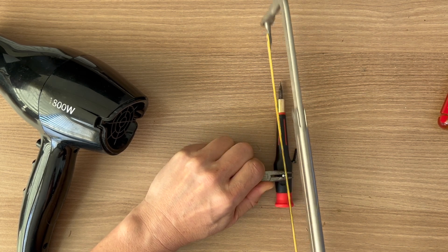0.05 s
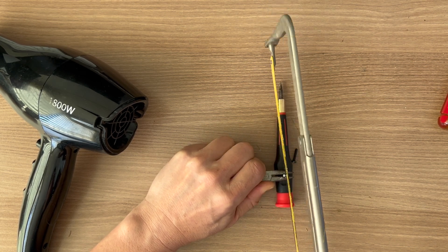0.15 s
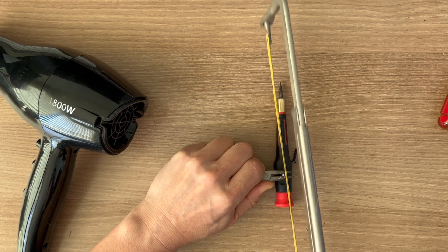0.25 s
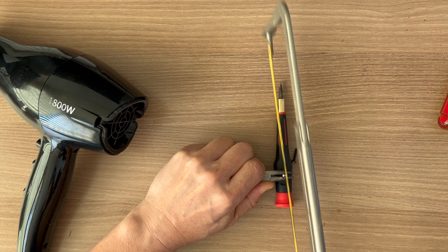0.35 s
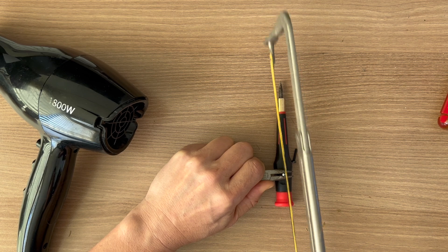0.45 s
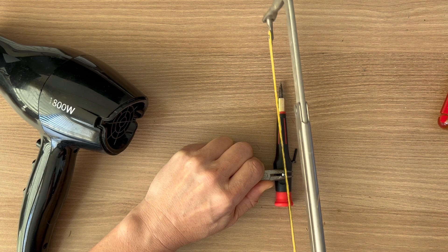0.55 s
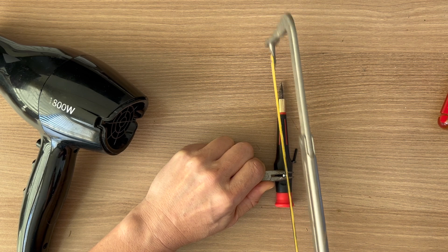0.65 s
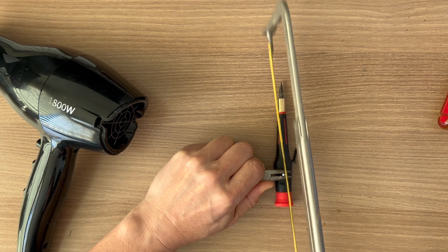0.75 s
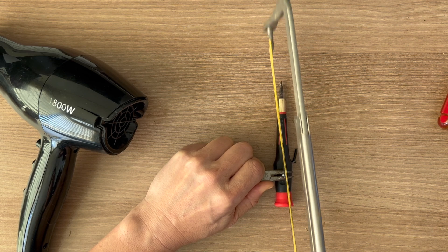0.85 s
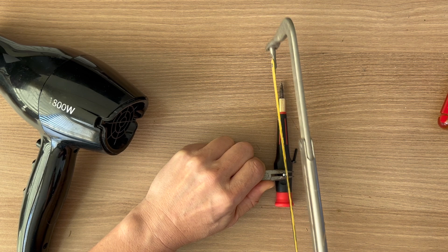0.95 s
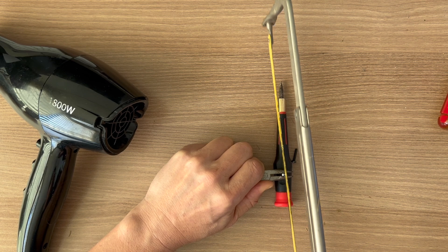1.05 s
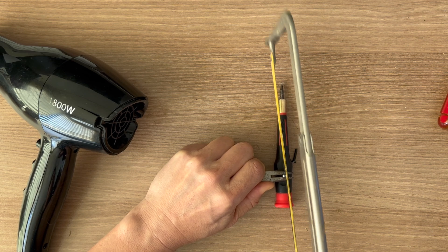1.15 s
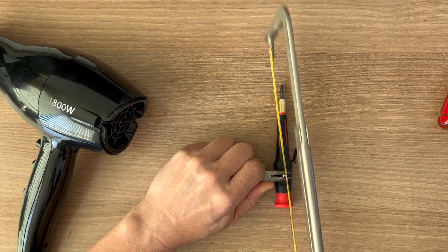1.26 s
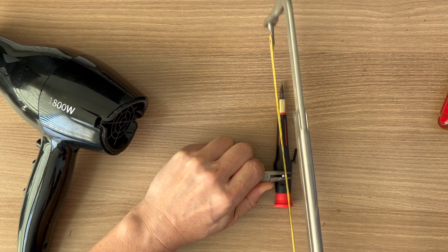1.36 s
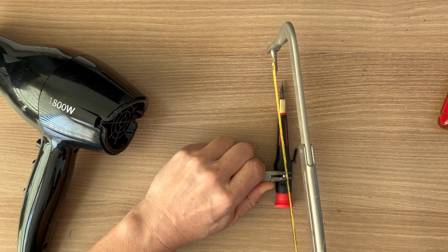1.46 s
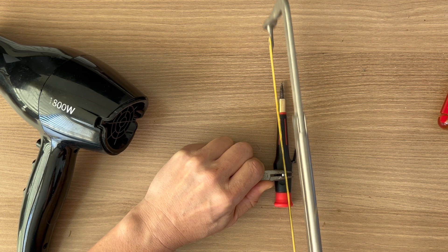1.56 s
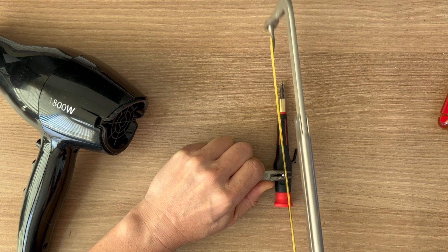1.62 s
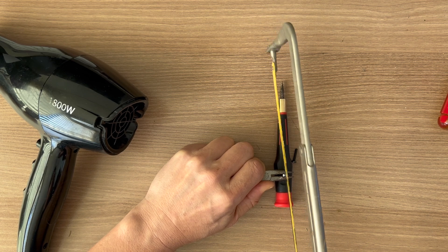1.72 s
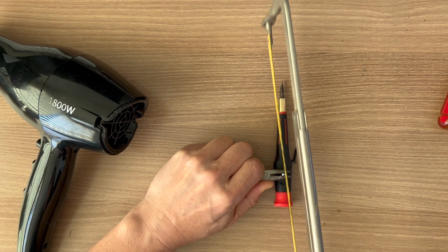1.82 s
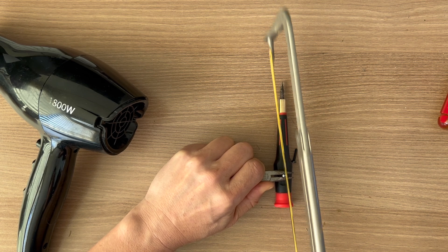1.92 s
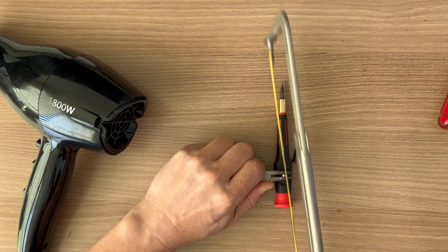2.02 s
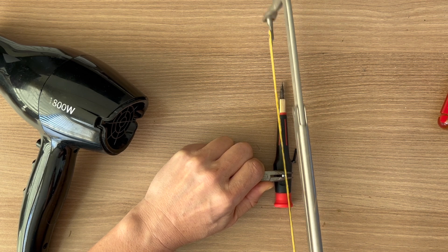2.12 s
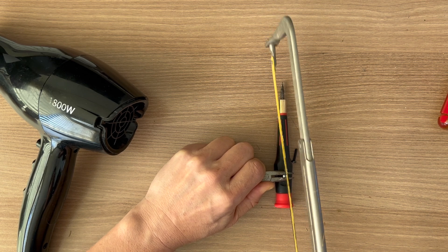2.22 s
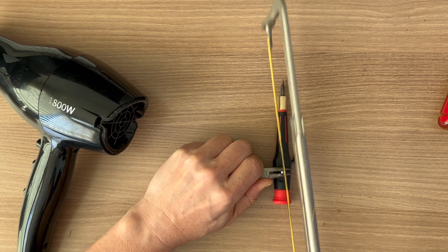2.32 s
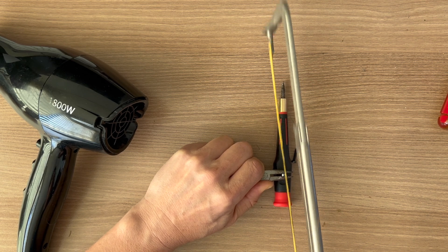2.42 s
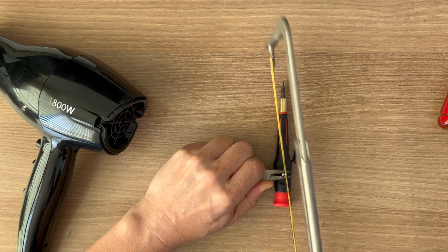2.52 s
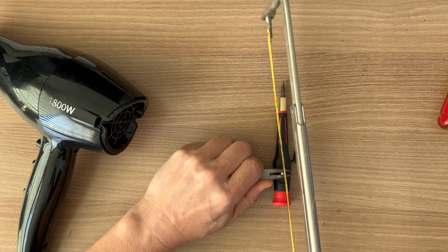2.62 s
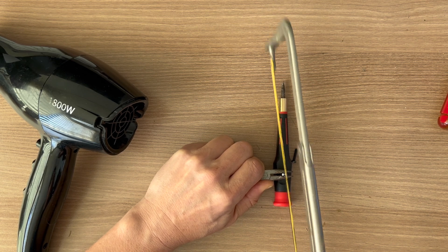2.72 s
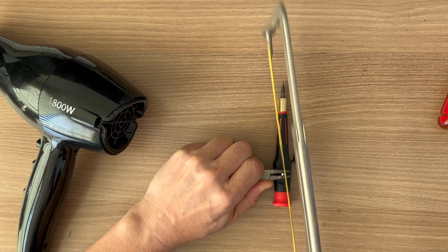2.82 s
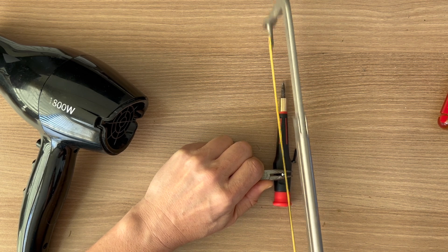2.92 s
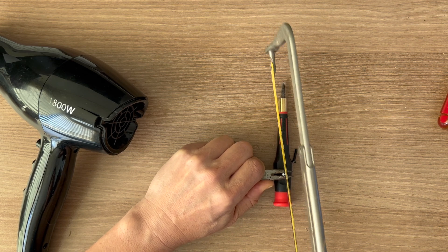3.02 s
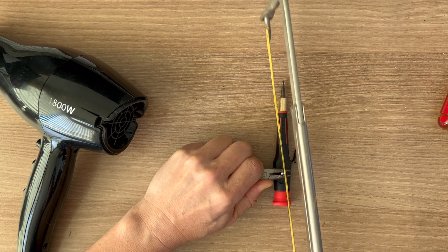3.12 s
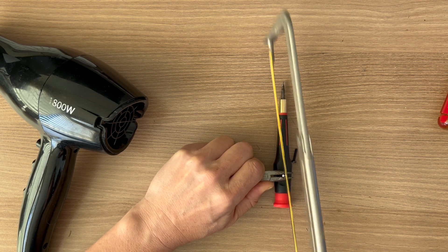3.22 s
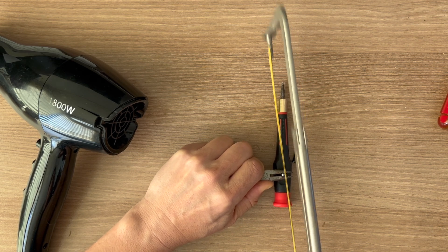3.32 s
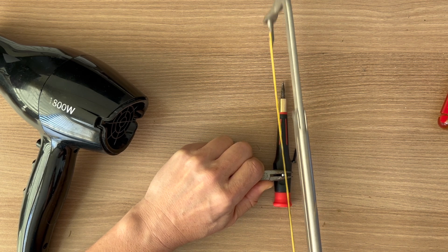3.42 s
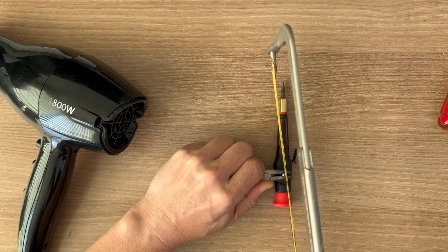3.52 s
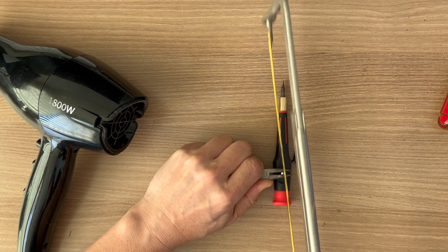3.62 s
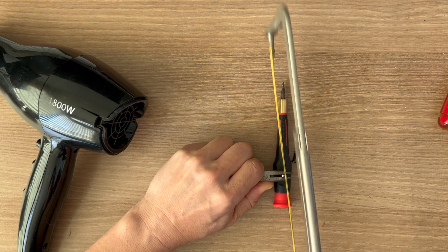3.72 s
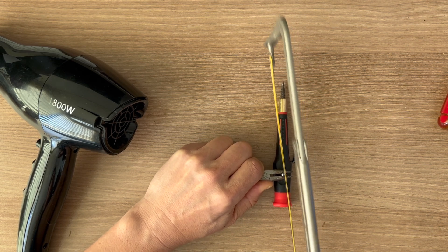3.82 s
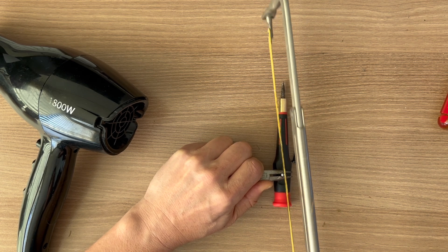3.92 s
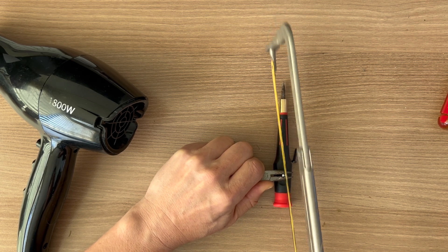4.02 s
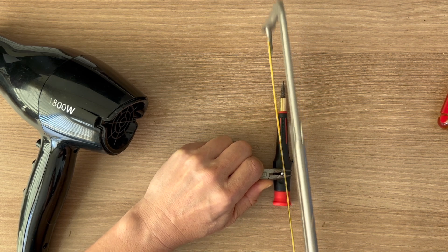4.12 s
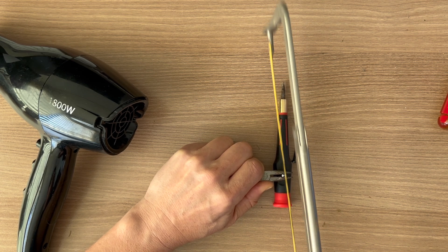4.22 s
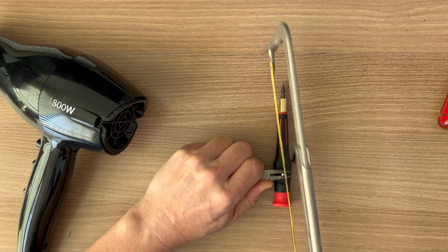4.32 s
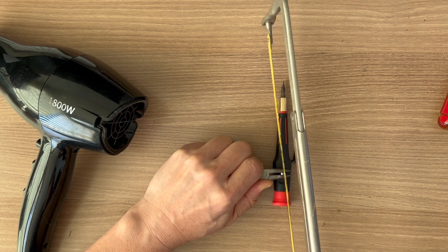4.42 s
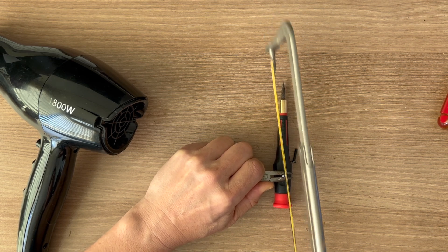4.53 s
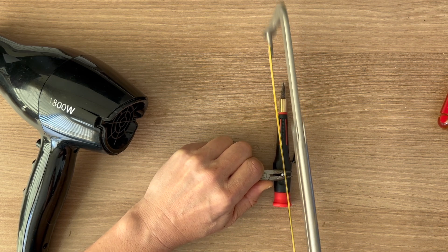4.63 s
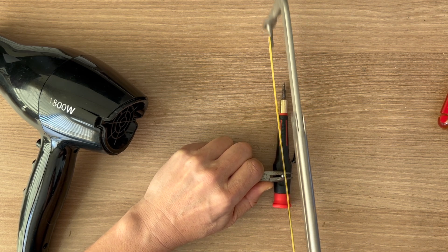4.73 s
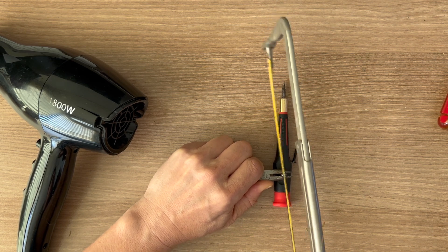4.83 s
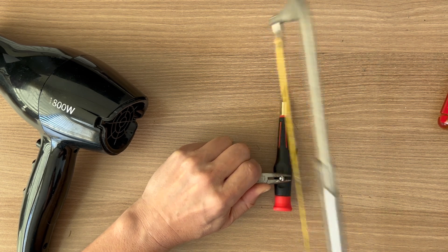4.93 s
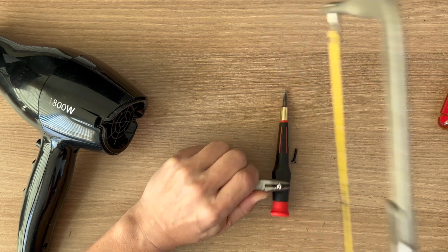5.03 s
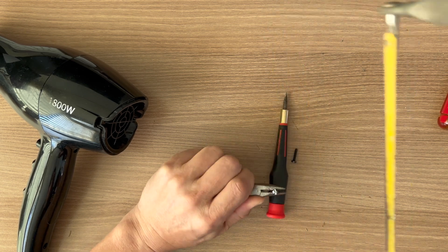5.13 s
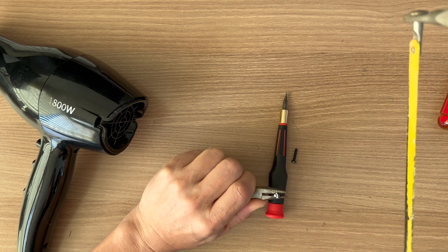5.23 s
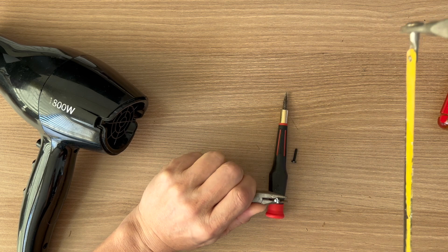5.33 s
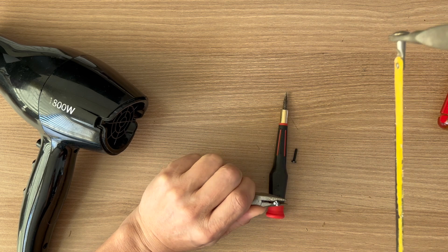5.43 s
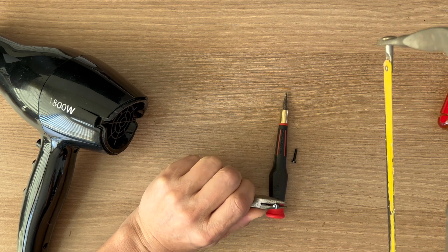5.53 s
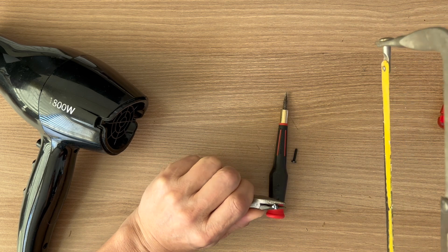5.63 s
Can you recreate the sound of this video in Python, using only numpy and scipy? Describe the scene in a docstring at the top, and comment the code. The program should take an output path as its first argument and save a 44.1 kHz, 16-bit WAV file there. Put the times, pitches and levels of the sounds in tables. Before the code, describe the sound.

Quick back-and-forth hacksaw strokes scrape and ring on metal, ending with a short clatter as the saw is put down.

```python
"""A hacksaw slots a small screw held in pliers on a wooden bench, in short quick strokes.
Each tooth bites and tears off chips: the steel saw rings and sings, the bench growls and rumbles
under the hand. The blade slips out of the slot, the saw is put down with a clatter, and a faint
whine swells. Heard from close by, on a two-port stereo microphone in a small, quiet room."""
import sys
import numpy as np
from scipy import signal
from scipy.fft import rfft, irfft, next_fast_len
from scipy.io import wavfile

SR = 44100
rng = np.random.default_rng(int(sys.argv[2]) if len(sys.argv) > 2 else 0)


def put_to_file(sound):
    """Save the sound as 16-bit audio at rate SR, in the file named by the first command-line argument."""
    columns = np.atleast_2d(sound).T  # one column per channel
    safe = np.clip(columns, -1, 1)
    whole_steps = np.round(safe * 32767)
    wavfile.write(sys.argv[1], SR, whole_steps.astype(np.int16))


N = 249606
TIME = np.arange(N) / SR
BODY_HZ = np.fft.rfftfreq(8192, 1 / SR)

# how alike the two microphone ports sound: (frequency [Hz], likeness [0-1])
MIC_LIKENESS = [(60, .955), (130, .92), (300, .87), (640, .48), (1300, .62), (2500, .6), (3500, .95),
                (4500, .65), (6200, .45), (7600, .75), (8600, .7), (9400, .997), (10700, .997), (11900, .5),
                (12500, .99), (14400, .99), (15500, .6)]
# how far the left port leads the right: (frequency [Hz], phase [rad])
MIC_LEAD = [(60, 0), (1800, 0), (2800, 1.2), (3400, .45), (4900, 1), (5700, -.7), (7200, -.3), (8400, -1.1),
            (9200, -3.1), (10600, -3.2), (11400, -4), (12200, -6.25), (15000, -6.4)]
# pull and push in turn, pull first: (time the blade breaks free [s], force [dB])
STROKES = [(-0.07, -19), (0.061, -30), (0.18, -30.5), (0.326, -28.5), (0.447, -27.5), (0.585, -29),
           (0.71, -29), (0.843, -30.5), (0.972, -28), (1.102, -30), (1.229, -28.5), (1.361, -27),
           (1.489, -27.5), (1.613, -27), (1.754, -27), (1.881, -28.0), (2.005, -27), (2.134, -30),
           (2.284, -29.5), (2.399, -28), (2.522, -26.5), (2.648, -26), (2.785, -25.5), (2.917, -27.5),
           (3.04, -26), (3.164, -26.5), (3.296, -27), (3.429, -26), (3.551, -26.5), (3.684, -27),
           (3.82, -27), (3.94, -26.5), (4.073, -27.5), (4.203, -28.5), (4.328, -28), (4.459, -28),
           (4.575, -25.5), (4.712, -33)]
# as the slot deepens, the blade travels further and the pliers shake less:
# (time [s], tooth rate [factor], shaking [dB])
REACH = [(0, 0.76, 0), (1.2, 0.87, 1), (1.999, 1.0, -2), (3.2, 1.02, -6.5), (4.801, 1.05, -5)]
# turns at which the blade jams and is wrenched free: (time [s], force [dB])
JAMS = [(0.325, -30), (1.105, -32), (2.287, -25), (3.553, -42), (4.072, -29), (4.205, -34.5), (4.459, -39)]
# resonances of blade and frame; the spot driven hardest lies at 0-1 on the pull, 1-2 on the push:
# (frequency [Hz], width [Hz], level [dB], left over right [dB], spot [strokes], swing [dB])
STEEL_MODES = [(3325, 10, 10, 9, .4, 1), (3408, 11, 13.5, -6, .5, 1), (3535, 45, 12.5, 9, .4, 1.5),
               (3580, 25, 17.5, -2.5, .3, 2), (3605, 14, 20, -2.5, .4, 1), (3900, 50, 3, -8, .3, 4),
               (4026, 25, 11.5, 2, .35, 3.5), (4365, 18, 3, 16.5, .75, 3.5), (4650, 160, 1, 0, 1.3, 6),
               (5020, 60, 7.5, 6, .8, 2.5), (5110, 110, 3, 0, 1.4, 6), (5200, 110, 4.5, 8, .2, 6),
               (5600, 30, 1, 0, .8, 1), (5865, 55, -2, 16, .6, 2), (6105, 30, 3.5, -4, 1.1, 2),
               (6520, 50, 4.5, -9, .25, 4), (6810, 44, 2.5, 17.5, 1.2, 4), (7070, 70, 2, 0, .3, 3),
               (7560, 45, 6, 8, .6, 2.5), (7690, 90, 4, 0, 1.4, 4), (7850, 110, 3, -6, .3, 5),
               (8080, 50, 0, 0, 1.7, 2), (8720, 60, 0, 0, 1.4, 2), (8930, 100, 0, 4, .1, 2),
               (9260, 100, -6, 0, 1.7, 2), (11450, 250, -3, 0, .3, 3), (13250, 260, -1.5, 2, 1.3, 2.5),
               (13860, 250, -5.5, -3.5, .4, 3)]
# broad response of blade and frame: (frequency [Hz], level [dB])
STEEL_COLOUR = [(100, -58), (1500, -18.5), (2500, -7), (3000, -7), (3800, -5), (4250, -4), (4800, -1.5),
                (6300, 0.5), (7700, -7.5), (8300, -8), (9000, -41), (10800, 1), (12100, -55), (13700, -42),
                (14400, -18), (15700, -56)]
# resonances of the bench top with the pliers on it, columns as in STEEL_MODES
BENCH_MODES = [(275, 20, 10.3, 0, .65, 2), (335, 30, 6, -3, .4, 3), (567, 42, 10.5, 1, 1.55, 2.5),
               (626, 55, 10.3, -1, 1.2, 1.5), (760, 35, 4, -3, .4, 1), (882, 30, 7, -3, .4, 1),
               (936, 24, 5, 4, 1.5, 3), (1035, 35, 8, 1, .2, 1.5), (1200, 40, -2, -3, .4, 2),
               (1338, 70, 7.5, 2, 1.1, 1.5), (1435, 50, 3, 3, .4, 1), (1525, 35, 1, 0, .9, 2),
               (1750, 120, -5, 0, 1.6, 4), (1880, 60, -4, 1, 1.65, 4), (2030, 60, -5, 0, 1.4, 4),
               (2150, 50, -4, 0, 1.4, 3), (2290, 40, -6, 0, .6, 2), (2900, 300, -18, 0, .4, 5)]
# broad response of the bench top: (frequency [Hz], level [dB])
BENCH_COLOUR = [(40, -2), (150, 2), (230, -29), (390, 6.5), (485, -29), (680, -25), (1000, -14),
                (1550, -43), (2200, -7), (2800, -23), (5000, -49), (16000, -49)]
# tones bowed out of the frame: (pitch [Hz], level against force [dB], left over right [dB], t60 [s])
FRAME_TONES = [(3326, -21.3, 9, .22), (3408, -12.6, -6, .22), (3604, -11, -2.5, .13)]
# spectrum of the swaying bench: (frequency [Hz], level [dB])
RUMBLE_COLOUR = [(20, -40), (33, -26), (50, -7), (63, 6), (80, -9), (100, -24), (133, 0), (175, -22),
                 (230, -25), (400, -14.5), (1500, -101)]
# spectrum of the room tone: (frequency [Hz], level [dB])
AIR_COLOUR = [(20, -45), (40, -15), (120, 5.5), (300, -9), (450, -4), (900, -3.5), (2700, -0.5),
              (4200, -4.5), (9000, -7.5), (12000, -14.5), (15500, -19)]
# how long the room holds a sound: (frequency [Hz], t60 [s])
ROOM_DECAY = [(100, 0.34), (300, 0.42), (1000, 0.24), (3000, 0.19), (8000, 0.2), (16000, 0.06)]
# teeth that catch: (time [s], level [dB], time to peak [s])
SNAGS = [(0.329, -32, 0.0026), (1.363, -36, 0.0037), (3.0797, -30, 0.0029), (3.458, -32, 0.0026),
         (3.961, -43, 0.0016), (3.993, -26, 0.0007), (4.253, -41, 0.0005), (4.789, -29, 0.0084)]
# spectrum of their screech: (frequency [Hz], level [dB])
SCREECH_COLOUR = [(100, -45), (3000, 6), (6500, 8), (8200, 14), (11000, -1), (12000, -8), (13700, 9),
                  (15700, -4)]
# the blade slips off, then the saw lands and bounces:
# (time [s], level [dB], hardness as treble [dB], weight as bass [dB], share of ringing steel [dB])
KNOCKS = [(4.8578, -6, -2, -9, -31), (5.005, -10.5, -17, -13, -20), (5.0393, 3.5, 0.5, 1.5, -13.5),
          (5.0435, 0, -26, 2, -24), (5.0884, -1, -4.5, -2, -26), (5.1084, -6.5, -2, -3, -30),
          (5.1203, -16.5, -1, -5, -23)]
# broad response of the bench to a knock: (frequency [Hz], level [dB])
KNOCK_COLOUR = [(20, -43), (45, -22), (100, -12), (150, 5), (200, 7), (260, 10), (370, 15), (510, 10.5),
                (620, 16.5), (850, 1), (980, -1), (1090, 12), (1200, 4), (1400, 12), (2100, 4), (3200, 5),
                (6500, -7.5), (9000, -17), (15000, -21)]
# dull bumps on the bench: (time [s], level [dB])
THUDS = [(5.059, -20.5), (5.111, -26.5), (5.318, -55)]
# swell of the faint whine: (time [s], level [dB])
WHINE_SWELL = [(5.3, -76), (5.45, -63.5), (5.66, -60)]

LAST_STROKE_END_S = 4.86
HAND_LEAD_S, BLADE_LEAD_S = 0.021, 0.0028  # pressure, then travel, turn before the blade breaks free
BENCH_BOOM_HZ = 140  # lowest pitch of the bench top


def gain_of(db):
    """Decibels to amplitude."""
    return 10 ** (np.asarray(db) / 20)


def unit_rms(x):
    """Scales to rms 1."""
    return x / np.sqrt(np.mean(x ** 2) + 1e-20)


def curve_at(points, hz):
    """Reads a table along a log-frequency axis."""
    table_hz, value = np.transpose(points)
    return np.interp(np.log(hz + 1), np.log(table_hz + 1), value)


def add(mix, start_s, sound):
    """Mixes a sound in at the given time."""
    part = mix[:, round(start_s * SR):][:, :sound.shape[1]]
    part += sound[:, :part.shape[1]]


def wander(rate_hz):
    """Slow random motion of rms 1, up to about the given rate."""
    size = next_fast_len(N, True)
    rolloff = 1 + (np.fft.rfftfreq(size, 1 / SR) / rate_hz) ** 4
    return unit_rms(irfft(rfft(rng.standard_normal(size)) / rolloff, size)[:N])


def through(x, ring):
    """Convolves channel by channel."""
    return signal.oaconvolve(x, ring, axes=1)[:, :N]


def body_response(colour, modes=(), modes_db=0, spread_s=0.002322):
    """Left and right impulse responses of a body, at a set energy: resonances on a broad spectrum."""
    hz, width, db, pan_db = np.reshape(modes, (-1, 6)).T[:4]
    peaks = 1 / (1 + ((BODY_HZ ** 2 - hz[:, None] ** 2) / (width[:, None] * BODY_HZ + 1)) ** 2)
    peak_power = gain_of(db + modes_db + np.array([pan_db, -pan_db]) / 2) ** 2
    power = gain_of(curve_at(colour, BODY_HZ)) ** 2 + peak_power @ peaks
    log_gain = np.log(np.hstack([power, power[:, -2:0:-1]])) / 2
    minimum_phase = np.exp(np.conj(signal.hilbert(log_gain)[:, :len(BODY_HZ)]))
    delay_s = spread_s / np.sqrt(1 + BODY_HZ / 700)  # bending waves: the treble arrives first
    ring = irfft(minimum_phase * np.exp(-2j * np.pi * np.cumsum(delay_s) * BODY_HZ[1]))
    return ring / np.sqrt(np.sum(ring ** 2) / 2)


def microphone(pair):
    """The two ports: unrelated sounds become a partly alike, phase-shifted left and right."""
    left, other = rfft(pair)
    hz = np.fft.rfftfreq(pair.shape[1], 1 / SR)
    likeness = np.clip(curve_at(MIC_LIKENESS, hz), 0, 1)
    right = (likeness * left + np.sqrt(1 - likeness ** 2) * other) * np.exp(-1j * curve_at(MIC_LEAD, hz))
    return irfft(np.array([left, right]), pair.shape[1])


def noise(colour):
    """Steady coloured noise of rms 1 at the microphone."""
    gain = gain_of(curve_at(colour, np.fft.rfftfreq(N, 1 / SR)))
    return unit_rms(microphone(irfft(rfft(rng.standard_normal((2, N))) * gain, N)))


def stroke_motion(lead_s, skew_shift=0, pull_skew=.71, push_skew=.79, skew_per_s=.035):
    """The hand's to and fro: an arch (0-1) for each stroke, and the strokes done so far."""
    turns = np.append(np.array(STROKES)[:, 0], LAST_STROKE_END_S)
    progress = np.interp(TIME + lead_s, turns, np.arange(len(turns)))
    # a lower skew peaks earlier; the arches grow more even as the slot deepens
    skew = np.where(progress % 2 >= 1, push_skew, pull_skew) + skew_per_s * TIME + skew_shift
    return np.abs(np.sin(np.pi * (progress % 1) ** skew)), progress


def teeth(speed, stroke, pull_hz=372.6, push_hz=384.1, wobble=.015, uneven_db=1.3):
    """Teeth pass the screw: an impulse for each, how far (0-1) it is through its cut, and its size."""
    times, reach, _ = np.transpose(REACH)
    rate_hz = np.where(stroke % 2, push_hz, pull_hz) * np.interp(TIME, times, reach) * speed ** .9
    passed = np.cumsum(rate_hz * (1 + wobble * wander(150))) / SR
    tooth = passed.astype(int)
    size = gain_of(uneven_db * rng.standard_normal(N))[tooth]
    return unit_rms(np.diff(tooth, prepend=0) * size), passed % 1, size


def scrape(impulses, cut, size, bite, grip):
    """Force of the cut: each tooth strikes, then tears a dense shower of tiny chips that thins out."""
    force = unit_rms(rng.standard_normal((2, N)) * size * (grip + np.exp(-cut / 0.36)))
    force[0] += bite * impulses
    return microphone(force) / np.sqrt(1 + bite ** 2)


def jerks(turn_db=-21, pull_grab_db=5.5, scatter_db=1.5, peak_s=0.0017):
    """Force of the stuck blade letting go: sudden, then fading; slight at a turn, hard after a jam."""
    starts, force_db = np.transpose(STROKES)
    pull = np.arange(len(starts)) % 2 == 0
    jerk_db = force_db + turn_db + pull_grab_db * pull - scatter_db * rng.standard_normal(len(starts))
    power, age = np.zeros((1, N)), np.arange(4096) / SR / peak_s
    for start_s, db in list(zip(starts, jerk_db))[1:] + JAMS:
        add(power, start_s, (gain_of(db) * age * np.exp(1 - age))[None] ** 2)
    return np.sqrt(power[0])


def sliding_contact(force, progress, colour, modes, scatter_db, steps_per_stroke=3):
    """A body driven at a moving point: each mode swells and fades along the stroke, never quite alike."""
    spot, swing_db = np.transpose(modes)[4:]
    out, step = np.zeros((2, N)), progress * steps_per_stroke
    for k in range(int(step[0]) + 1, int(step[-1])):
        first, last = np.searchsorted(step, [k - 1, k + 1])
        drive_db = swing_db * np.cos(np.pi * (k / steps_per_stroke - spot))
        drive_db += scatter_db * rng.standard_normal(len(modes))
        crossfaded = force[:, first:last] * (1 - abs(step[first:last] - k))
        ring = body_response(colour, modes, drive_db)
        add(out, first / SR, signal.fftconvolve(crossfaded, ring, axes=1))
    return out


def frame_singing(effort, waver_hz=3.5, waver_db=2, lift_s=4.825, lift_db=-21.5, lift_width_s=0.0081):
    """Friction bows the frame like a string: thin tones ring on through the turns and the lift-off."""
    lift_off = gain_of(lift_db) * np.exp(-((TIME - lift_s) / lift_width_s) ** 2)  # the blade drags out
    out = np.zeros((2, N))
    for hz, db, pan_db, t60 in FRAME_TONES:
        bowing = (effort + lift_off) * gain_of(db + waver_db * wander(12))
        decay = gain_of(-60 / (t60 * SR))
        level = signal.lfilter([1 - decay], [1, -decay], bowing)
        phase = 2 * np.pi * np.cumsum(hz + waver_hz * wander(22.9)) / SR
        tone = np.sqrt(2) * np.sin([phase, phase - curve_at(MIC_LEAD, hz)])
        out += level * gain_of([[pan_db / 2], [-pan_db / 2]]) * tone
    return out


def pliers_thrum(cut, speed, progress, pull_db=-17, push_db=-25.5, swell_db=14.5, top_hz=400):
    """Riding over the teeth shakes the pliers at the tooth rate: a growl that swells along the pull."""
    stroke = np.minimum(progress.astype(int), len(STROKES) - 1)
    times, _, shaking_db = np.transpose(REACH)
    db = np.array(STROKES)[stroke, 1] + np.interp(TIME, times, shaking_db)
    db += np.where(stroke % 2, push_db, pull_db + swell_db * (progress - stroke - .5))
    riding = np.sqrt(2) * np.sin(2 * np.pi * cut) * speed ** 0.97 * gain_of(db)
    return signal.sosfiltfilt(signal.butter(2, top_hz, fs=SR, output="sos"), riding)


def bench_boom(cut, speed, force_db, along, share_db=-8, swell_db=7, width_hz=55):
    """The bench top answers near each turn, as the tooth rate crosses its lowest pitch."""
    level = gain_of(force_db + share_db + swell_db * along)
    riding = np.sqrt(2) * np.sin(2 * np.pi * cut) * np.sqrt(speed) * level
    return signal.lfilter(*signal.iirpeak(BENCH_BOOM_HZ, BENCH_BOOM_HZ / width_hz, SR), riding)


def sawing(chatter_db=0.46, hollow_hz=485, hollow_width_hz=68):
    """The teeth drive the steel saw and, through screw and pliers, the bench."""
    pressure, progress = stroke_motion(HAND_LEAD_S)
    speed, blade_progress = stroke_motion(BLADE_LEAD_S, skew_shift=-.17)
    stroke = np.minimum(progress.astype(int), len(STROKES) - 1)
    force_db, push = np.array(STROKES)[stroke, 1], stroke % 2 == 1
    along = progress - stroke - .5  # strokes before or after mid-stroke
    impulses, cut, size = teeth(speed, blade_progress.astype(int))
    effort = np.hypot(pressure ** 2.03 * gain_of(force_db), jerks())
    effort *= gain_of(-chatter_db * wander(120))  # the blade chatters in its slot
    steel_db = np.where(push, -2, -0.3)
    bench_db = np.where(push, 0.5 + 0.5 * along, -1 + 10 * along)  # a push leans, a pull builds up
    on_steel = scrape(impulses, cut, size, bite=0.27, grip=0.7) * effort * gain_of(steel_db)
    on_bench = scrape(impulses, cut, size, bite=0.13, grip=0.47) * effort * gain_of(bench_db)
    on_bench += pliers_thrum(cut, speed, blade_progress)
    # driven through the pliers, the bench hardly moves at one pitch
    on_bench = signal.lfilter(*signal.iirnotch(hollow_hz, hollow_hz / hollow_width_hz, SR), on_bench)
    steel = sliding_contact(on_steel, progress, STEEL_COLOUR, STEEL_MODES, scatter_db=3.5)
    singing = frame_singing(effort * gain_of(np.where(push, -1, 0)))
    bench = sliding_contact(on_bench, progress, BENCH_COLOUR, BENCH_MODES, scatter_db=2.25)
    return steel + singing + bench + bench_boom(cut, speed, force_db, along)


def settling(from_s, db_per_s=184):
    """Gain of the bench's swaying: 1 until the given time, then dying away."""
    return gain_of(-db_per_s * np.maximum(TIME - from_s, 0))


def bench_rumble(sawing_db=-40, stop_s=4.81, landing_db=-37, rise_s=0.026, rest_db=-58):
    """The bench top sways low and evenly under the sawing hand, and once more as the saw lands."""
    rocking = gain_of(sawing_db) * settling(stop_s)
    landing_s = max(KNOCKS, key=lambda knock: knock[1])[0]
    rise = np.clip((TIME - landing_s) / rise_s, 0, 1)
    landing = gain_of(landing_db) * rise * settling(landing_s + rise_s)
    return noise(RUMBLE_COLOUR) * np.sqrt(rocking ** 2 + landing ** 2 + gain_of(rest_db) ** 2)


def room_tone(level_db=-52.3):
    """The air of the quiet room: a soft, steady hiss."""
    return gain_of(level_db) * noise(AIR_COLOUR)


def reflections(sound, delay_s=0.012):
    """Near walls send dense echoes to the microphone, each band dying at its own speed."""
    hz, t, bands = signal.stft(rng.standard_normal((2, SR // 2)), SR, nperseg=256)
    tail = signal.istft(bands * gain_of(-60 * t / curve_at(ROOM_DECAY, hz)[:, None]), SR, nperseg=256)[1]
    tail[:, :round(delay_s * SR)] = 0
    return microphone(through(sound[:1], tail / np.linalg.norm(tail[0])))


def snags():
    """A caught tooth tears loose with a short bright screech."""
    force = np.zeros((2, N))
    for start_s, db, peak_s in SNAGS:
        age = np.arange(4096) / SR / peak_s
        add(force, start_s, gain_of(db) * age * np.exp(1 - age) * rng.standard_normal((2, len(age))))
    return through(microphone(force), body_response(SCREECH_COLOUR))


def knocks(boost_db=8.6, crack_s=0.002, buzz_share=0.65, buzz_s=0.011):
    """Each knock is a hard blow with a brief crack and a buzz of loose metal; it rings bench and saw."""
    t, hz = np.arange(4096) / SR, np.fft.rfftfreq(4096, 1 / SR)
    treble = 1 / (1 + (3500 / (hz + 1)) ** 2)
    bass = 1 / (1 + (hz / 450) ** 4)
    impact = np.array([[1], [0]]) * (1 - treble)
    on_bench, on_steel = np.zeros((2, 2, N))
    for start_s, db, hard_db, weight_db, steel_db in KNOCKS:
        crack, buzz = (rng.standard_normal((2, len(t))) * np.exp(-t / life) * np.sqrt(2 / (life * SR))
                       for life in (crack_s, buzz_s))
        spectrum = impact + rfft(crack) * treble + buzz_share * rfft(buzz)
        blow = irfft(spectrum * gain_of(boost_db + db + hard_db * treble + weight_db * bass))
        blow[:, len(t) // 2:] = 0
        add(on_bench, start_s, blow)
        add(on_steel, start_s, gain_of(steel_db) * blow)
    bench = through(microphone(on_bench), body_response(KNOCK_COLOUR, BENCH_MODES, modes_db=5.5))
    steel = through(microphone(on_steel), body_response(STEEL_COLOUR, STEEL_MODES))
    return bench + steel


def thuds(rise_s=0.0054, t60_s=0.1):
    """Dull bumps of the saw's weight and the hand: the bench top booms at its lowest pitch."""
    out, t = np.zeros((2, N)), np.arange(SR // 2) / SR
    boom = np.sin(2 * np.pi * BENCH_BOOM_HZ * t) * (1 - np.exp(-t / rise_s)) * gain_of(-60 * t / t60_s)
    for start_s, db in THUDS:
        add(out, start_s, gain_of(db) * boom[None])
    return out


def whine(pitch_hz=1360, waver_hz=12):
    """A faint wavering tone, centred between the ports, swells in the quiet at the end."""
    phase = 2 * np.pi * np.cumsum(pitch_hz + waver_hz * wander(19)) / SR
    return gain_of(np.interp(TIME, *np.transpose(WHINE_SWELL))) * np.sqrt(2) * np.sin(phase)


def scene(saw_room_db=-12, clatter_room_db=-13):
    """Saw, clatter and bench close to the microphone, with the room behind them."""
    saw = sawing() + snags()
    clatter = knocks() + thuds()
    room = gain_of(saw_room_db) * reflections(saw) + gain_of(clatter_room_db) * reflections(clatter)
    return saw + clatter + room + bench_rumble() + whine() + room_tone()


def record(dry, low_cut_hz=30, top_hz=15850):
    """The recorder's low cut and band limit."""
    trimmed = signal.sosfilt(signal.butter(2, low_cut_hz, "high", fs=SR, output="sos"), dry)
    band_limit = signal.firwin(511, top_hz, window=("kaiser", 9), fs=SR)
    return signal.oaconvolve(trimmed, band_limit[None], "same")


dry = scene()
out = record(dry)
put_to_file(out)
```